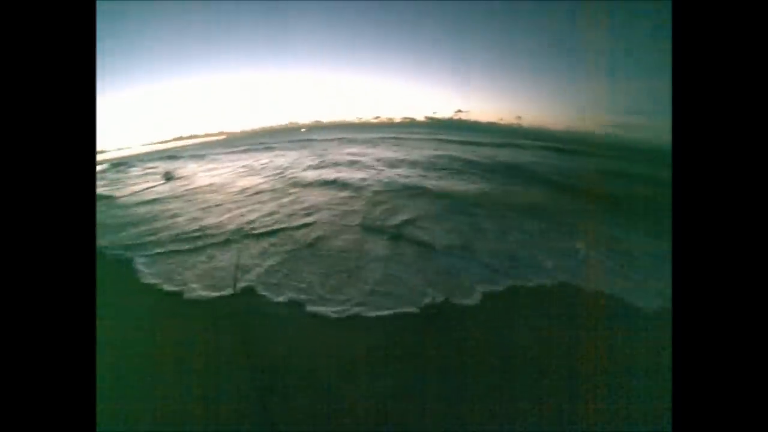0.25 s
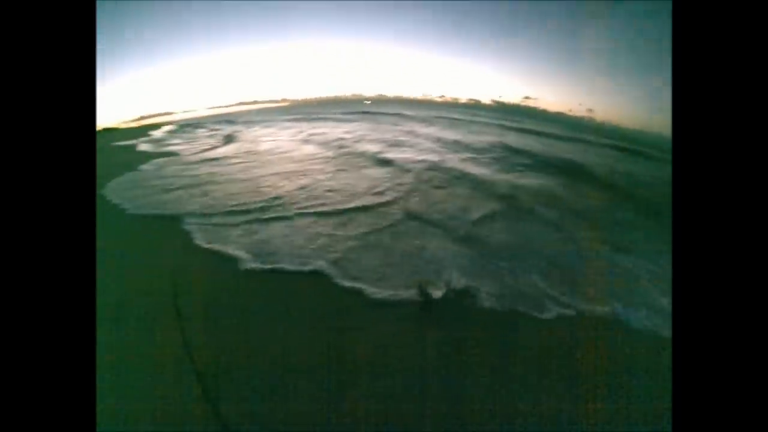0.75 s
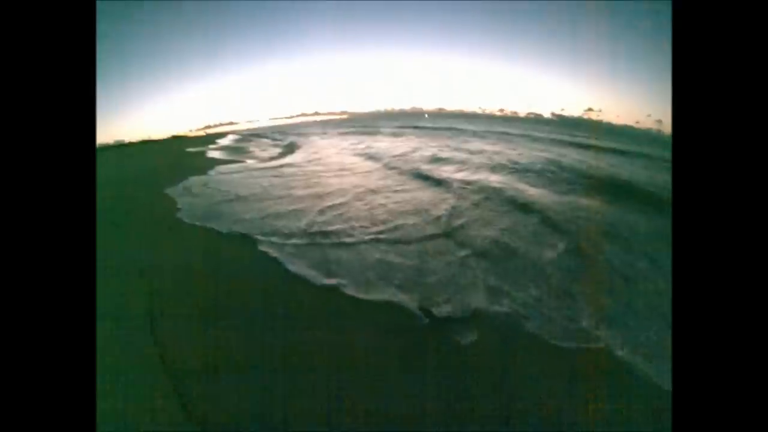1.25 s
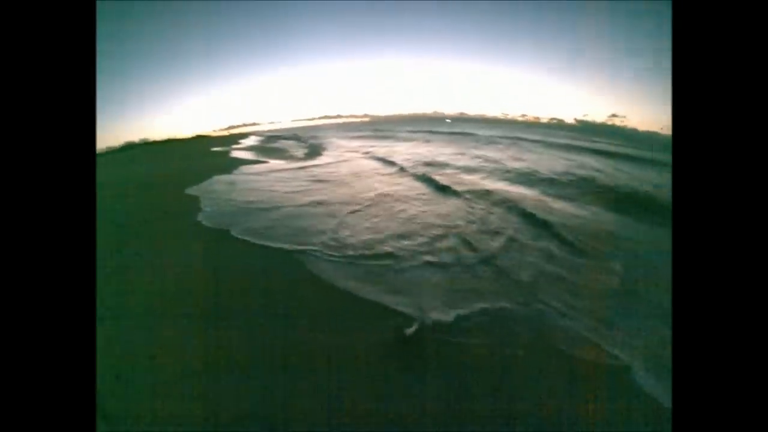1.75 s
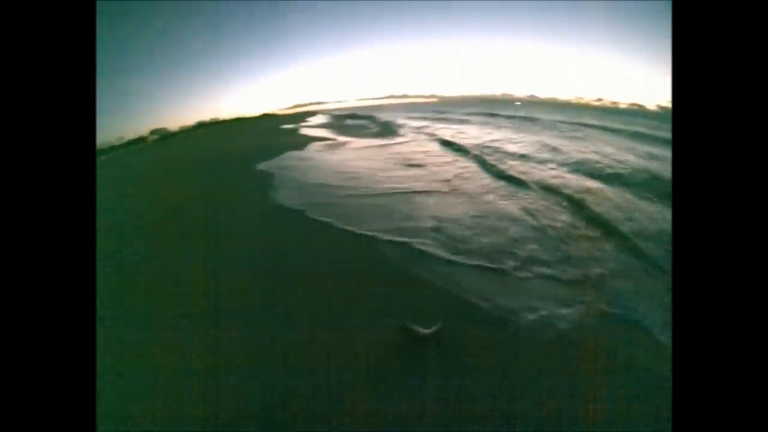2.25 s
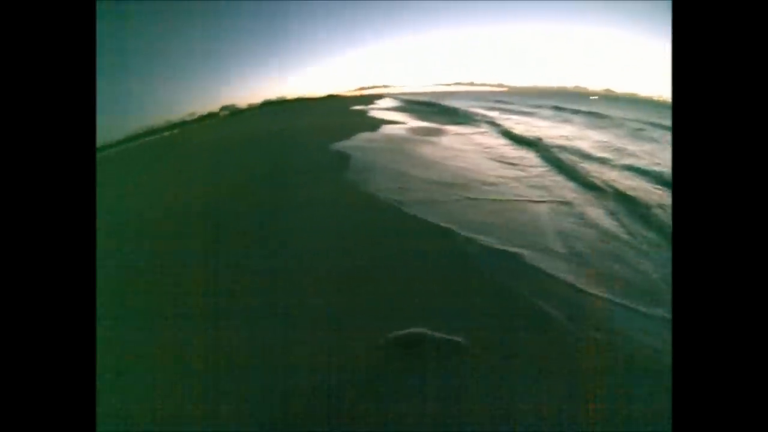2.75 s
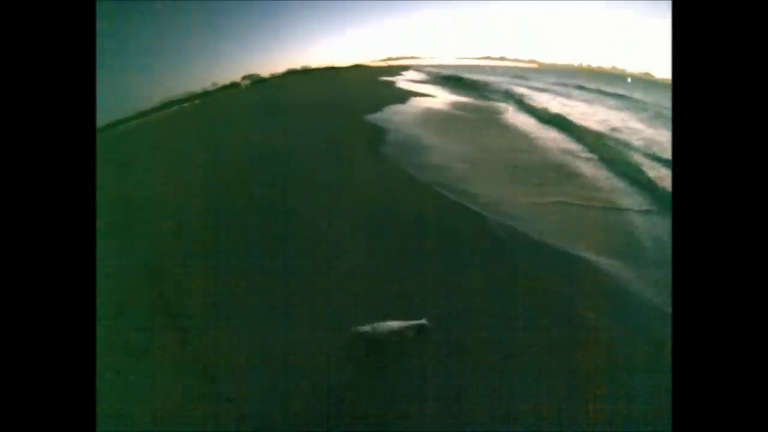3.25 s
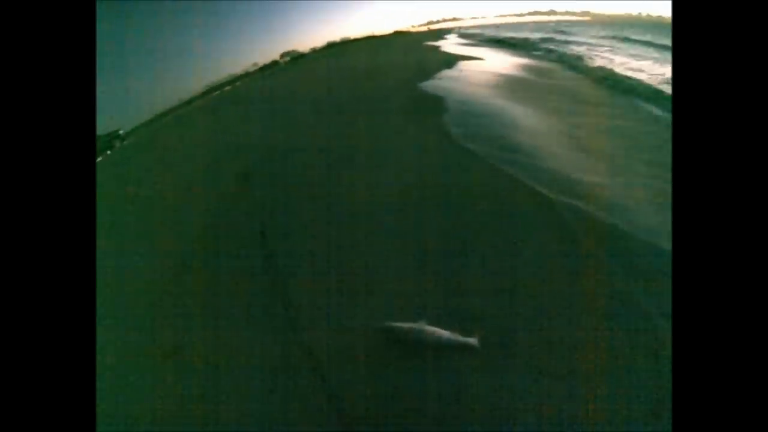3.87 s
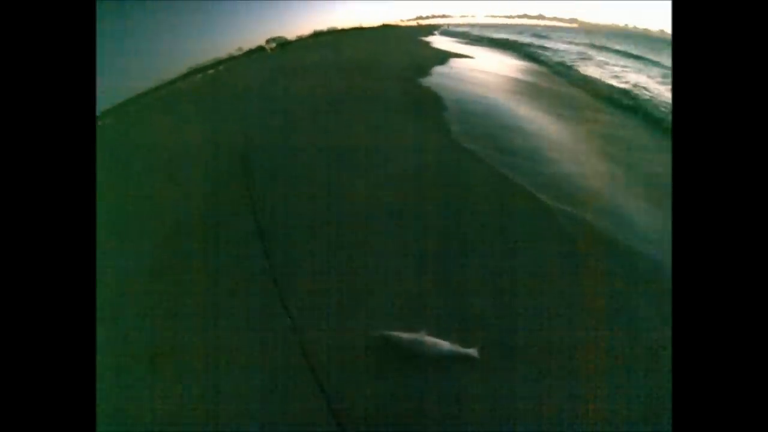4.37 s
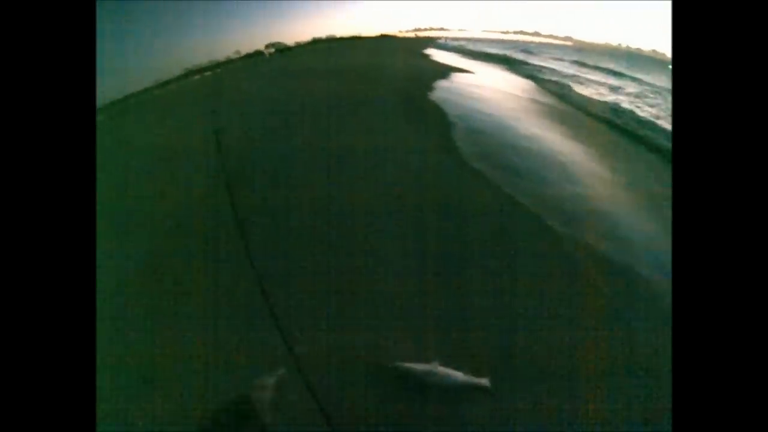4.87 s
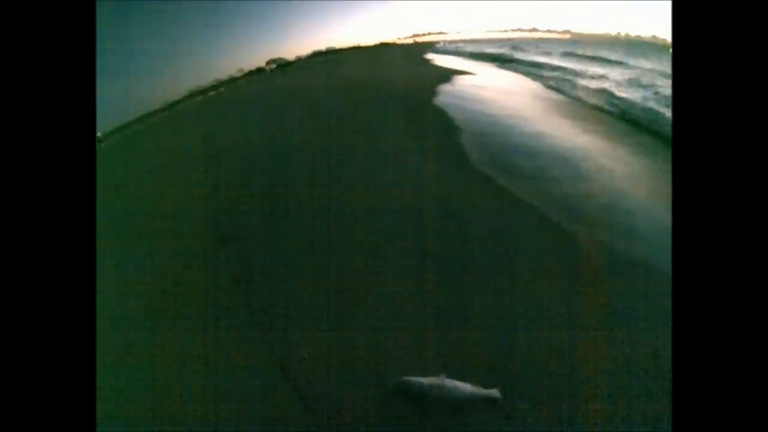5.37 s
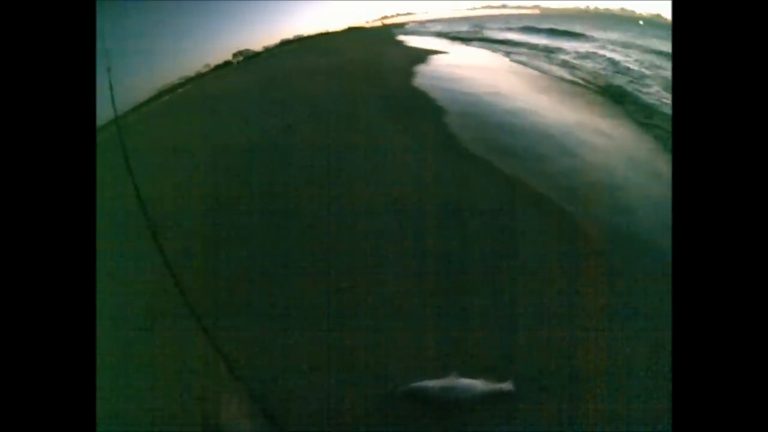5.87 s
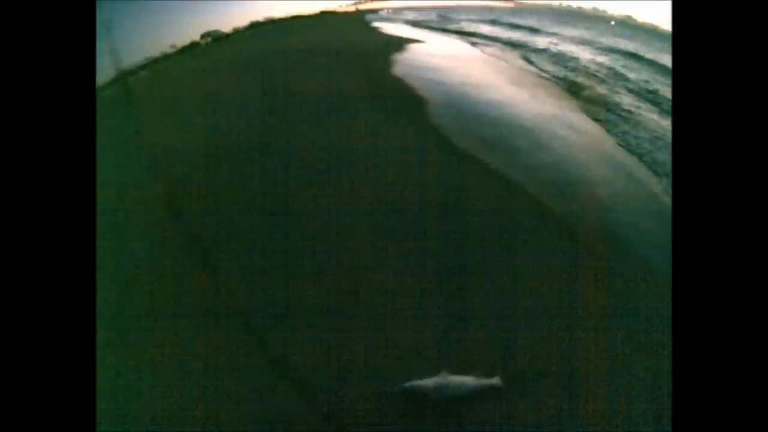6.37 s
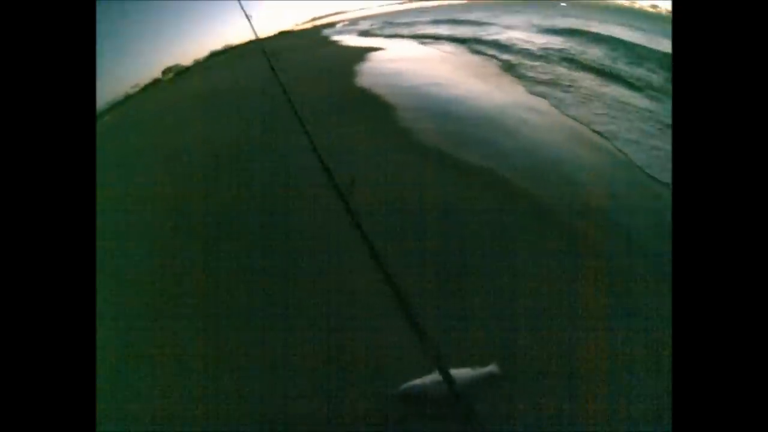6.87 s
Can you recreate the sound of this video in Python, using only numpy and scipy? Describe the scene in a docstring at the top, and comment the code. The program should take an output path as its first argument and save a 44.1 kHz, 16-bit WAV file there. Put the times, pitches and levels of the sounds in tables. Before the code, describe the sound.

Boxy, muffled beach surf with fizzing foam, rumbling wind, scattered hard housing knocks and faint scratchy ticks, ending with a knock and small lap.

```python
"""Small surf washes up and down a sandy beach, heard inside a body-worn camera housing ringing near 1.45 kHz.
Surf is shaped noise: breakers roar, foam fizzes with added bubble impulses, and a thin hiss wavers above.
Knocks of fishing gear are leaking pressure drops plus blows to the cavity, each filtered by its response.
Ticks, a line's rasp, shudders and a chatter are bursts of tiny random impulses.
Wind and the wearer's movements rumble as low noise, in slow buffeting and a lumpy flutter."""
import sys
import numpy as np
from scipy import signal
from scipy.fft import rfft, irfft, next_fast_len
from scipy.io import wavfile
from scipy.ndimage import uniform_filter1d, map_coordinates

SR = 44100
rng = np.random.default_rng(int(sys.argv[2]) if len(sys.argv) > 2 else 0)


def wav_out(sig):
    """Save sig, one row per channel (or a flat mono array), as 16-bit PCM at SR to the path in sys.argv[1]."""
    wavfile.write(sys.argv[1], SR, np.round(np.clip(np.atleast_2d(sig).T, -1, 1) * 32767).astype(np.int16))


N = 313992  # length in samples


def amp(db):
    """Logarithmic level: decibels become an amplitude ratio."""
    return 10 ** (np.asarray(db) / 20)


def unit(x):
    """Normalisation: scale a signal to rms 1."""
    return x / np.sqrt(np.mean(x ** 2) + 1e-20)


def gain(points, size):
    """Frequency response: (hz, db) points, joined along log frequency, become gains on an FFT grid."""
    hz, db = np.transpose(points)
    grid_hz = np.fft.rfftfreq(size, 1 / SR)
    return amp(np.interp(np.log(grid_hz + 1), np.log(hz + 1), db))


def curves(rows):
    """Envelopes: straight lines in time for each column after the first."""
    s, *columns = np.transpose(rows)
    t = np.arange(N) / SR
    return [np.interp(t, s, column) for column in columns]


def wobble(rate):
    """Slow random modulation: a smooth curve through `rate` normal knots a second."""
    knots = rng.standard_normal(int(N * rate / SR) + 4)
    return map_coordinates(knots, [np.arange(N) * rate / SR])


def swell(s, width, db):
    """Gaussian envelope: a bell centred on s seconds, falling to 1/e at `width` seconds either side."""
    t = np.arange(N) / SR
    return amp(db) * np.exp(-((t - s) / width) ** 2)


def colour(x, spectrum):
    """Spectral shaping: multiply by a gain curve without phase shift, then scale to rms 1."""
    size = next_fast_len(N + SR // 2)
    shaped = irfft(rfft(x, size) * gain(spectrum, size), size)
    return unit(shaped[:N])


def through(x, spectrum, size=8192):
    """Minimum-phase filtering: folding the cepstrum makes a causal response with the given gains."""
    cepstrum = irfft(np.log(gain(spectrum, size)))
    cepstrum[1:size // 2] *= 2
    cepstrum[size // 2 + 1:] = 0
    response = irfft(np.exp(rfft(cepstrum)))
    return signal.fftconvolve(x, response)[:N]


def rush(spectrum, patchy_db):
    """Turbulent noise: random gains in smooth time-frequency patches, shaped to rms 1."""
    z = signal.stft(rng.standard_normal(N), nperseg=512)[2]
    field = uniform_filter1d(rng.standard_normal(z.shape), size=6, axis=0)
    field = uniform_filter1d(field, size=14, axis=1)
    patchy = signal.istft(z * amp(patchy_db * unit(field)), nperseg=512)[1]
    return colour(patchy[:N], spectrum)


def grains(spectrum, rate):
    """Shot noise: sparse random impulses, on average `rate` a second, shaped to rms 1."""
    impulses = (rng.random(N) < rate / SR) * rng.standard_normal(N)
    return colour(impulses, spectrum)


def add(track, s, sound):
    """Superposition: mix a sound into the track from s seconds."""
    part = track[max(round(s * SR), 0):][:len(sound)]
    part += sound[:len(part)]


# One wave drains away and the next washes up, before trims: start_s [s], breakers_db [dB], foam_db [dB]
WAVE_LEVELS = [(0, -56.0, -54.5), (0.5, -59.0, -59.5), (1.0, -60.5, -61.0), (1.9, -64.5, -67),
               (2.4, -60.5, -65), (2.7, -56, -62), (3.0, -58.5, -60.5), (3.25, -55.0, -56),
               (4.1, -54.0, -53.5), (5.2, -54, -56), (6.55, -60, -66), (7.12, -60.5, -62.5)]


def surf():
    """Common modulation: one random churn wavers breakers and foam; the hiss stays nearly steady."""
    breakers_db, foam_db = curves(WAVE_LEVELS)
    churn = wobble(7)
    return breakers(breakers_db, churn) + foam(foam_db, churn) + hiss(foam_db)


# Relative spectrum of the breakers: frequency_hz [Hz], density_db [dB per Hz]
BREAKERS_SPECTRUM = [(100, -3), (300, -5.5), (500, -8.5), (800, -8.5), (1080, -14.5), (1250, -7),
                     (1440, 3.5), (1600, -5), (1780, -11.5), (2250, -11.5), (3000, -30), (6000, -55)]
BREAKERS_TRIM_DB = -1.56


def breakers(level_db, churn):
    """Turbulent roar: waves breaking further out sound as broadband noise under a slow envelope."""
    level = amp(level_db + BREAKERS_TRIM_DB + 0.95 * churn)
    return level * rush(BREAKERS_SPECTRUM, patchy_db=1.2)


# Relative spectrum of the foam: frequency_hz [Hz], density_db [dB per Hz]
FOAM_SPECTRUM = [(900, -30.5), (1750, -9), (2250, 0.5), (2600, -3.5), (2950, -9.5), (3300, -6.5),
                 (3700, -6), (4100, -21.5), (4900, -14.5), (6000, -22), (7500, -17), (12000, -33)]
FOAM_TRIM_DB = -2.5
LAP_AT_S, LAP_WIDTH_S, LAP_DB = 6.96, 0.072, -58.5  # a small wave laps close by


def foam(level_db, churn):
    """Bubble noise: bursting bubbles are shot noise over a continuous rush; a lap adds in power."""
    bubbles = grains(FOAM_SPECTRUM, rate=1500)
    fizz = unit(rush(FOAM_SPECTRUM, patchy_db=1.14) + 0.53 * bubbles)
    wash = amp(level_db + FOAM_TRIM_DB + 0.98 * churn)
    lap = swell(LAP_AT_S, LAP_WIDTH_S, LAP_DB)
    return np.hypot(wash, lap) * fizz


# Relative spectrum of the thin hiss: frequency_hz [Hz], density_db [dB per Hz]
HISS_SPECTRUM = [(300, 11), (2000, -8), (4300, -1), (5500, -2.5), (7000, -3), (9000, -7.5), (11400, -5.5),
                 (13000, -10.5), (15000, -12), (15800, -26)]
HISS_DB, HISS_GROW = -64.5, 0.037  # level at the mean foam curve; dB per dB of foam


def hiss(foam_db):
    """Amplitude modulation: thin noise stays nearly steady, with its own random waver."""
    foam_rise_db = foam_db - foam_db.mean()
    level = amp(HISS_DB + HISS_GROW * foam_rise_db + 0.45 * wobble(16))
    return level * rush(HISS_SPECTRUM, patchy_db=2.15)


# Knocks on the housing, before trims: start_s [s], pressure_drop_db [dB], cavity_ring_db [dB]
KNOCK_EVENTS = [(0.2803, -23.5, -32), (0.438, -33, -41), (0.6931, -38, -34), (0.8675, -14, -30.5),
                (1.016, -38, -34.5), (1.0867, -16.5, -23.5), (1.2426, -21.5, -33.5), (1.7795, -29.5, -46),
                (2.2443, -11, -41), (2.4068, -35.5, -44), (2.7, -35.5, -58), (2.7857, -18.5, -30.5),
                (2.8655, -35, -38), (2.9768, -23, -33), (3.5614, -31, -34.5), (3.7111, -31, -39),
                (4.085, -33.5, -58), (4.1728, -34.5, -54), (4.438, -29, -52), (4.6303, -18, -33.5),
                (4.706, -21.5, -35.5), (4.9305, -20.5, -32.5), (6.6426, -12, -27), (6.8471, -24.5, -35),
                (7.0979, -26, -35.5)]
# How the housing passes a pressure step: frequency_hz [Hz], gain_db [dB]
HOUSING_GAIN = [(20, 5), (85, 3.5), (165, -1), (250, 1), (420, -1.5), (600, -5.5), (1000, -7.5),
                (1700, -11), (1950, -14.5), (2900, -25), (3900, -6.5), (5000, -19.5), (7000, -22),
                (15000, -24)]
# How the cavity answers a blow: frequency_hz [Hz], gain_db [dB]
CAVITY_GAIN = [(300, -14.5), (1000, -7.5), (1300, -2.5), (1490, 6.5), (1750, -3.5), (1900, -12),
               (2050, -34), (5000, -53)]


def knocks(leak_hz=21, leak_t60_s=0.12, ring_trim_db=23, drop_trim_db=-1.5):
    """Transient excitation: pressure drops suddenly, then leaks back with overshoot; the cavity rings."""
    t = np.arange(SR // 5) / SR
    leak = np.sin(2 * np.pi * leak_hz * t) * amp(-60 * t / leak_t60_s)
    drop = -np.diff(leak) / leak[1]  # falls to -1 at once and averages to zero
    drops, blows = np.zeros(N), np.zeros(N)
    for s, db, cavity_db in KNOCK_EVENTS:
        add(drops, s, amp(db + drop_trim_db) * drop)
        add(blows, s, [-amp(cavity_db + ring_trim_db)])
    return through(drops, HOUSING_GAIN) + through(blows, CAVITY_GAIN)


# Light scratchy ticks, before the trim: start_s [s], peak_db [dB], brightness [0-1, bright share of power]
TICK_EVENTS = [(0.2404, -43, 0.44), (0.255, -51, 0.6), (0.4383, -43.5, 0.4), (0.616, -51, 0.44),
               (0.687, -45.5, 0.1), (1.047, -48.5, 0.2), (1.196, -51, 0.34), (1.802, -54, 0.75),
               (2.069, -50.5, 0.76), (2.157, -50, 0.2), (5.526, -59, 0.4)]
# Relative spectrum of dull scratches: frequency_hz [Hz], density_db [dB per Hz]
DULL_SPECTRUM = [(700, -11), (1450, 4), (1900, -4.5), (2400, 1), (3000, -8), (3700, -0.5), (5400, -11.5),
                 (9000, -51), (15000, -32)]
# Relative spectrum of bright scratches: frequency_hz [Hz], density_db [dB per Hz]
BRIGHT_SPECTRUM = [(1500, -22), (3700, 9), (5400, 2), (7000, 4), (9000, -9), (15000, -9)]
TICK_PEAK_S, TICK_TRIM_DB = 0.006, -4.0  # time from start to peak; level trim


def ticks():
    """Stick-slip friction: each scratch of the gear is a short run of tiny slips, dull or bright."""
    u = np.arange(SR // 5) / SR / TICK_PEAK_S
    shape = (u * np.exp(1 - u)) ** 3
    dull, bright = np.zeros((2, N))
    for s, db, brightness in TICK_EVENTS:
        stroke = amp(db + TICK_TRIM_DB) * shape
        share = np.clip(brightness, 0, 1)
        add(dull, s, np.sqrt(1 - share) * stroke)
        add(bright, s, np.sqrt(share) * stroke)
    return dull * grains(DULL_SPECTRUM, rate=4600) + bright * grains(BRIGHT_SPECTRUM, rate=7100)


# Line rubbing on the gear: start_s [s], end_s [s], level_db [dB]
RUB_EVENTS = [(4.727, 4.995, -65.5), (5.52, 5.91, -66.5)]
# Relative spectrum of the rasp: frequency_hz [Hz], density_db [dB per Hz]
RASP_SPECTRUM = [(2000, -45), (3500, -1), (4050, 0), (4500, -11), (5200, -1.5), (5800, -19), (9000, -21),
                 (15000, -36)]


def line_rasp():
    """Rubbing friction: shot noise with an uneven level lasts as long as the line rubs."""
    t = np.arange(N) / SR
    rub = np.zeros(N)
    for start, end, db in RUB_EVENTS:
        edge_distance_s = np.minimum(t - start, end - t)
        rub += amp(db) * np.clip(edge_distance_s / 0.0089, 0, 1)  # 8.9 ms ramps
    return rub * amp(2.5 * wobble(25)) * grains(RASP_SPECTRUM, rate=2000)


# Low shudders of the housing as it shifts: centre_s [s], half_width_s [s], level_db [dB]
SHUDDER_EVENTS = [(2.175, 0.016, -49.5), (3.635, 0.033, -49), (4.54, 0.025, -49)]
# Relative spectrum of a shudder: frequency_hz [Hz], density_db [dB per Hz]
SHUDDER_SPECTRUM = [(100, -28), (165, -8), (205, 9), (260, -9.5), (420, -12.5), (800, -32), (3000, -88)]


def housing_shudder():
    """Structure-borne sound: the shifting housing gives low shot noise in bell-shaped bursts."""
    level = sum(swell(*row) for row in SHUDDER_EVENTS)
    return level * grains(SHUDDER_SPECTRUM, rate=1100)


# A loose part chatters just after a hard knock: centre_s [s], half_width_s [s], level_db [dB]
CHATTER_EVENT = (6.6505, 0.0046, -40.5)
# Relative spectrum of the chatter: frequency_hz [Hz], density_db [dB per Hz]
CHATTER_SPECTRUM = [(300, -4), (850, 8), (1500, 2), (1850, -15), (2250, 3), (2800, -19), (4200, -16),
                    (8000, -57)]


def gear_chatter():
    """Repeated impact: a loose part gives one brief burst of dense shot noise."""
    return swell(*CHATTER_EVENT) * grains(CHATTER_SPECTRUM, rate=6530)


SWAY_S, SWAY_LEAD_S = 0.09, 0.016  # half width; time the peak leads the knock
SWAY_DB, SWAY_GROW = -23, 0.41  # level at a 0 dB knock in the table; dB per dB of knock


def sway():
    """Power summation: the movement that brings each knock makes a swell that grows with the knock."""
    power = np.zeros(N)
    for s, db, _ in KNOCK_EVENTS:
        power += swell(s - SWAY_LEAD_S, SWAY_S, SWAY_DB + SWAY_GROW * db) ** 2
    return np.sqrt(power)


# Gusts on the housing, before trims: start_s [s], buffeting_db [dB], flutter_db [dB]
GUST_LEVELS = [(0, -32.5, -47.5), (0.6, -42.5, -53.5), (1.0, -30, -48), (1.5, -37, -52), (1.8, -33, -55),
               (2.5, -41, -59.5), (3.2, -37.5, -53.5), (3.65, -33.5, -52.5), (3.95, -42.5, -53),
               (4.7, -39, -51.5), (5.25, -38.5, -49), (5.75, -35.5, -47.5), (6.4, -33, -47.5),
               (7.12, -33, -52.5)]


def wind():
    """Common modulation: movement and random eddies swell the buffeting and flutter together."""
    buffet_db, flutter_db = curves(GUST_LEVELS)
    movement = sway()
    eddies = wobble(15)
    return buffeting(buffet_db, movement, eddies) + flutter(flutter_db, movement, eddies)


# Relative spectrum of slow eddies: frequency_hz [Hz], density_db [dB per Hz]
BUFFET_SPECTRUM = [(5, -0.5), (12, 1), (25, 0.5), (45, -14), (80, -23), (150, -58.5), (600, -110)]
BUFFET_TRIM_DB = 1.5


def buffeting(level_db, movement, eddies):
    """Turbulent pressure: slow eddies push on the housing as very low noise."""
    level = np.hypot(amp(level_db + BUFFET_TRIM_DB), movement)
    return level * amp(2.04 * eddies) * rush(BUFFET_SPECTRUM, patchy_db=0.1)


# Relative spectrum of the flutter: frequency_hz [Hz], density_db [dB per Hz]
FLUTTER_SPECTRUM = [(30, -8.5), (65, 2), (105, 0), (170, -7.5), (230, -7.5), (320, -21.5), (600, -26),
                    (3000, -83)]
FLUTTER_TRIM_DB, SWAY_FLUTTER_DB = -5, -26.5  # gust trim; movement's flutter relative to its swell


def flutter(level_db, movement, eddies):
    """Random amplitude modulation: faster wobbles on the shared eddies make low noise lumpy."""
    level = np.hypot(amp(level_db + FLUTTER_TRIM_DB), amp(SWAY_FLUTTER_DB) * movement)
    lumps = amp(1.35 * eddies + 1.5 * wobble(30))
    return level * lumps * rush(FLUTTER_SPECTRUM, patchy_db=1.5)


def scene():
    """Superposition: sea, gear and wind add at one microphone."""
    gear = knocks() + ticks() + line_rasp() + housing_shudder() + gear_chatter()
    return (surf() + gear + wind())[None]


TOP_HZ = 15750


def record(dry):
    """Band limiting: the camera keeps nothing from TOP_HZ upward."""
    size = next_fast_len(N + SR // 2)
    kept = np.fft.rfftfreq(size, 1 / SR) < TOP_HZ
    return irfft(rfft(dry, size) * kept, size)[:, :N]


dry = scene()
out = record(dry)
wav_out(out)
```